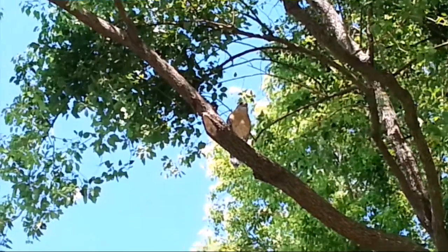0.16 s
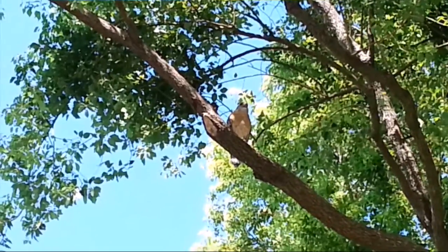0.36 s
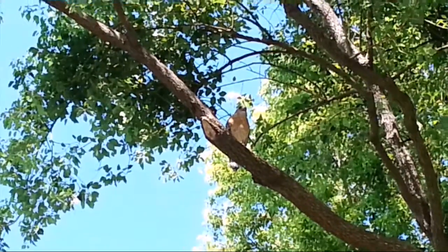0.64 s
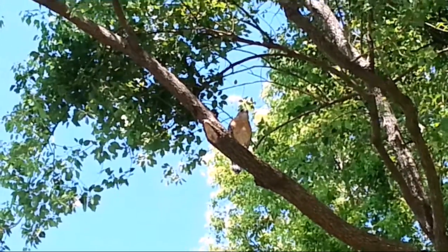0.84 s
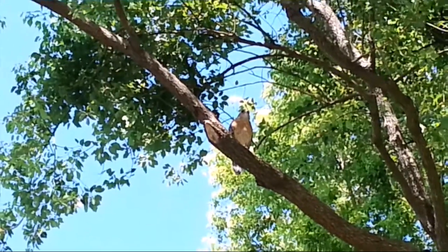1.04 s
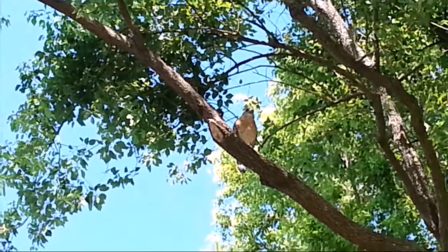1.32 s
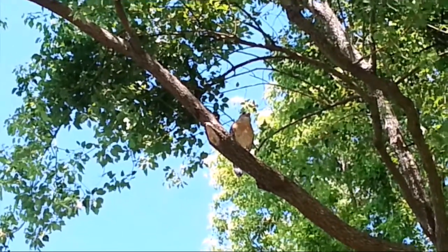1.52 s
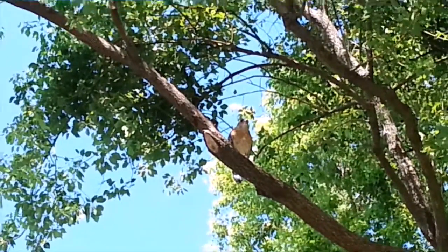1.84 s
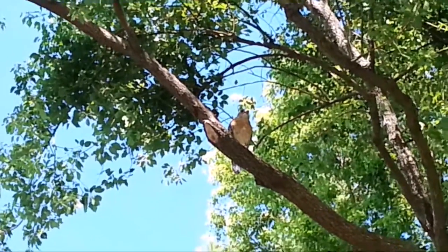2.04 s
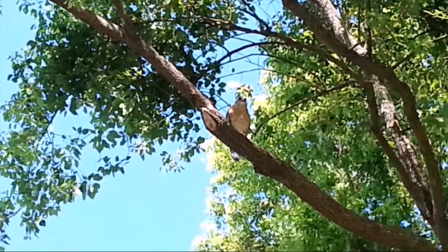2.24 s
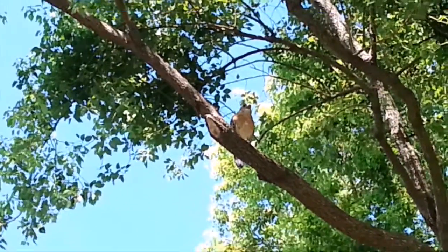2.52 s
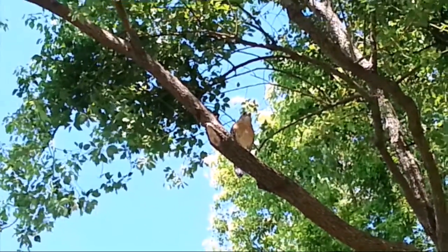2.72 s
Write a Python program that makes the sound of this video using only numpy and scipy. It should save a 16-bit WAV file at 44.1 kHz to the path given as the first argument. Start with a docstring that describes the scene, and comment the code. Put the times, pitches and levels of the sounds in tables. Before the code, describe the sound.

Hawk screams harshly three times from a tree while low wind rumbles and thumps the microphone

```python
"""Gusty wind over a faint outdoor hiss of leaves, with a far hum and insects: noise cut into wide and narrow bands.
A hawk on a branch then screams three times, each a stack of overtones following a pitch curve:
a quick rise, a loud sagging note that breaks down twice, a weak falling tail.
Near branches and farther trees scatter the voice: it is convolved with dying noise.
Wind also thumps on each microphone port, as short wave bursts; near the end come dry taps, as fast-dying sines."""
import sys
import numpy as np
from scipy import signal
from scipy.io import wavfile

SR = 44100
rng = np.random.default_rng(int(sys.argv[2]) if len(sys.argv) > 2 else 0)


def waveform_to_disk(signal):
    """Save audio, clipped to [-1, 1], as 16-bit WAV at the path in sys.argv[1]."""
    frames = np.transpose(np.atleast_2d(signal))
    scaled = np.clip(frames, -1, 1) * 32767
    samples = np.round(scaled).astype(np.int16)
    wavfile.write(sys.argv[1], SR, samples)


N = 127890  # length in samples, 2.9 s


def from_db(db):
    """Turn decibels into a plain factor."""
    return 10 ** (np.asarray(db) / 20)


def rms_one(x):
    """Scale a sound to an average strength (RMS) of 1."""
    return x / np.sqrt(np.mean(x ** 2) + 1e-20)


def at_hz(points, hz, column=1):
    """Read one column of a table at any frequency, along a logarithmic pitch scale."""
    points = np.array(points, float)
    return np.interp(np.log(hz), np.log(points[:, 0] + 1), points[:, column])


def drift(hz, size=N):
    """Random wandering of RMS 1: noise smoothed twice, so that it moves at about the given speed."""
    warm_up = 8000
    r = np.exp(-2 * np.pi * hz / SR)
    noise = rng.standard_normal(size + warm_up)
    smooth = signal.lfilter([1], [1, -2 * r, r * r], noise)
    return rms_one(smooth[warm_up:])


def band(x, low_hz, high_hz):
    """Keep mainly what lies between two frequencies."""
    sos = signal.butter(2, [low_hz, high_hz], "band", fs=SR, output="sos")
    return signal.sosfilt(sos, x)


# course of the wind at the ports: time_s, level_db (before the lift), left_minus_right_db
WIND_COURSE = [(0.0, -51.5, -11), (0.35, -40.5, 4.5), (0.39, -44, -10), (0.45, -43, 12), (0.49, -50, -2),
               (0.84, -51, -4), (1.0, -34, -3), (1.08, -43.5, -5), (1.57, -45, -5.5), (1.61, -40.5, 4),
               (1.71, -48, 4), (1.77, -43.5, -5), (2.08, -42.5, 7.5), (2.33, -41.5, -5), (2.43, -44, 22),
               (2.46, -45.5, -0.5), (2.82, -50, 4.0), (2.9, -44, -13)]
WIND_LOW_HZ, WIND_HIGH_HZ, WIND_LIFT_DB = 67.1, 1.46 * 187, 5.5
LUMP_DB, LUMP_HZ = 3, 25.4  # how strongly and how fast the noise swells


def wind():
    """Moving air makes lumpy low noise at each port, independent of the other."""
    time_s, level_db, pan_db = np.transpose(WIND_COURSE)
    t = np.arange(N) / SR
    out = np.zeros((2, N))
    for port, side in enumerate((.5, -.5)):
        lumps = rng.standard_normal(N) * from_db(LUMP_DB * drift(LUMP_HZ))
        rumble = rms_one(band(lumps, WIND_LOW_HZ, WIND_HIGH_HZ))
        port_db = np.interp(t, time_s, level_db + side * pan_db)
        out[port] = from_db(WIND_LIFT_DB + port_db) * rumble
    return out


# tone colour of the hiss: pitch_hz, relative level_db (only the differences count)
AIR_COLOUR = [(180, -30), (300, -9.5), (444, -28.5), (532, 12), (752, -23), (823, 6.5), (1160, -18.5),
              (1290, -12.5), (1620, -19), (1910, -15.5), (2060, -8), (3610, -17.5), (4520, -13),
              (6390, -33.5), (8640, -18.5), (10000, -14.5), (11000, -79.5), (14300, -103), (22000, -120)]
# how alike left and right are: pitch_hz, likeness (-1 opposite, 0 unrelated, 1 the same)
AIR_ALIKE = [(60, 0.3), (220, 0.12), (830, 0.35), (3080, -0.4), (11500, 0.38)]
AIR_DB, AIR_TOP_HZ = -43, 10200  # overall level, upper end
PATCHY_DB, PATCHY_HZ = 3.2, 11.2  # flicker depth and speed


def air():
    """Leaves: third-octave bands of noise, each flickering on its own."""
    out = 0
    edges_hz = 280 * 2 ** np.arange(0, 5.4, 1 / 3)
    # neighbouring bands take turns with two noise pairs, so they stay unrelated
    white = rng.standard_normal((2, 2, N))
    for k, (low_hz, high_hz) in enumerate(zip(edges_hz, edges_hz[1:])):
        mid, side = band(white[k % 2], low_hz, high_hz)
        centre_hz = np.sqrt(low_hz * high_hz)
        alike = np.clip(at_hz(AIR_ALIKE, centre_hz), -1, 1)
        stereo = np.sqrt(1 + alike) * mid + np.sqrt(1 - alike) * side * [[1], [-1]]
        level_db = at_hz(AIR_COLOUR, centre_hz) + PATCHY_DB * drift(PATCHY_HZ)
        out = out + from_db(level_db) * stereo
    top_cut = signal.cheby2(8, 50, AIR_TOP_HZ, fs=SR, output="sos")
    return from_db(AIR_DB) * rms_one(signal.sosfilt(top_cut, out))


# far hum and insects: pitch_hz, width_hz, level_db (before the flicker)
NARROW_BANDS = [(533, 29, -55.5), (4730, 310, -61), (9050, 590, -62)]


def drones():
    """A far hum and insects: flickering narrow bands of noise, partly shared by the ports."""
    out = 0
    for hz, width_hz, level_db in NARROW_BANDS:
        noise = rng.standard_normal(N) + 0.47 * rng.standard_normal((2, N))  # shared + own
        tone = rms_one(band(noise, hz - width_hz / 2, hz + width_hz / 2))
        out = out + from_db(level_db + 2.5 * drift(10)) * tone
    return out


# one list per scream: time_s, pitch_hz (before jitter), effort level_db (before overtone and path levels)
SCREAM_CURVES = [
    [(0.186, 682, -19.5), (0.198, 888, -17.5), (0.21, 1004, -7.5), (0.214, 1296, -5.5), (0.218, 1316, -3.5),
     (0.228, 1350, 2), (0.248, 1359, 2.5), (0.292, 1316, -2), (0.336, 1307, -3), (0.456, 1235, -4.5),
     (0.5, 1204, -7), (0.518, 1131, -6.5), (0.546, 1126, -8), (0.562, 1096, -6), (0.566, 1078, -7.5),
     (0.568, 1043, -13), (0.57, 1015, -11), (0.666, 1006, -11), (0.736, 969.6, -14.5), (0.774, 969.4, -14),
     (0.83, 922, -16.5), (0.848, 902.4, -16.5), (0.86, 869, -14.5), (0.868, 816, -15.5),
     (0.9, 547.4, -26.5), (0.906, 542, -31)],
    [(1.236, 677, -20.5), (1.244, 740, -17.9), (1.248, 870, -19), (1.26, 1040, -8), (1.264, 1246, -12.8),
     (1.268, 1340, 0.4), (1.28, 1373, 2), (1.302, 1365, 2.5), (1.374, 1303, -3), (1.456, 1278, -4.5),
     (1.504, 1229, -5), (1.534, 1216, -7.5), (1.544, 1195, -6), (1.548, 1163, -8), (1.552, 1141, -5),
     (1.592, 1122, -7), (1.602, 1100, -8.5), (1.608, 1093, -5.5), (1.614, 1053, -7.5), (1.616, 1026, -11),
     (1.702, 1005, -11), (1.844, 928, -15.5), (1.868, 858, -15.5), (1.878, 816, -14.5), (1.9, 621, -22.5),
     (1.916, 559.5, -39)],
    [(2.182, 709, -20.5), (2.188, 742, -17.5), (2.198, 942, -12), (2.206, 1022, -9.5), (2.208, 1233, -9.8),
     (2.214, 1348, -0.7), (2.224, 1351, 1.5), (2.238, 1364, 3.5), (2.268, 1325, -0.5), (2.372, 1273, -3.5),
     (2.414, 1227, -6.5), (2.436, 1194, -6), (2.448, 1123, -4.5), (2.474, 1112, -6.5), (2.484, 1093, -4.5),
     (2.488, 1063, -10.5), (2.49, 1035, -19), (2.492, 1031, -8), (2.53, 1030, -10.5), (2.62, 976.2, -12.5),
     (2.662, 968.6, -14), (2.73, 933.5, -15), (2.74, 923, -15.5), (2.78, 853, -16), (2.784, 848, -15),
     (2.826, 529, -25.5)],
]
# overtones at the syrinx, the bird's voice organ, from the fundamental up: level_db
OVERTONE_LEVELS = [0.64, 0.22, -0.24, -1, 0, 0, 2, -2, 6.8, 12, 6.5]
# throat, beak and nearby reflections as each port hears them:
# pitch_hz, left_db, right_db, left_lead_rad (how far the left wave runs ahead)
VOICE_PATH = [(860, -32, -31.5, -1), (961, -21.5, -25, -5.7), (1034, -39, -31.5, 1.2),
              (1110, -32, -26.5, 0.1), (1147, -27.5, -23, -0.4), (1240, -20.5, -18.5, -1.8),
              (1380, -23, -22.5, 0.8), (1670, -24, -25.5, 1), (1817, -15, -10, 0.8),
              (1806, -17.3, -4.5, -0.3), (2012, -16, -6.5, 2.5), (2184, -8, -6.5, 3),
              (2180, -12.7, -16.5, 1.5), (2307, -6.5, -7, -0.2), (2411, -2, -5.5, -0.06),
              (2495, -0.5, 1.5, -0.44), (2534, -1.5, -0.65, -0.5), (2597, -12, -2.5, 0.1),
              (2654, -9, -6, -1.54), (2692, -16, -10.5, -2.5), (2737, -9, -11.5, -2), (2760, -3, -13, -0.3),
              (2916, -5.5, -7.5, -2.3), (3014, -10.5, -10.5, 0.5), (3074, -16, -15.5, -0.8),
              (3130, -22.5, -19.5, 0), (3320, -11, -12, -2.5), (3440, -9, -11.5, -1.5),
              (3686, -17, -10.5, 0.5), (3747, -21.5, -25, 1.3), (3960, -16.5, -23, 0.9),
              (4000, -16.5, -15.5, -1), (4250, -28.5, -24.3, -1), (4340, -28, -26.3, -2),
              (4532, -17, -18, -0.8), (4730, -12.5, -10.5, 0.3), (4847, -15.5, -10, 0.6),
              (5024, -22, -25, 0.9), (5133, -22, -18, 1.6), (5310, -22, -14.5, 0.5),
              (5505, -21.5, -14.5, 1.4), (5210, -29, -19, 0.4), (6150, -27.5, -26.5, 1.5),
              (6430, -31.5, -32, 1.6), (6330, -26, -25, 1.86), (6670, -27, -32.5, 2),
              (7570, -30.5, -42, -0.2), (8130, -29, -35, 0.3), (8220, -38, -47, 2),
              (8900, -39.5, -41.5, 0.7), (9100, -40.5, -57.5, -0.6), (9800, -40, -51, 1.4),
              (10300, -37, -52.5, 0), (10100, -44, -59, -6), (10600, -42, -57.5, -6),
              (11200, -29.5, -32, -2)]
FADE_S = .006
JITTER, JITTER_HZ = .0007, 50  # pitch wobble: share of the pitch, speed
SHIMMER_DB, SHIMMER_HZ = 1.0, 30  # loudness wobble of each overtone
DULL_DB = 0.04  # per overtone number and dB of effort: weaker cries sound duller
HOARSE, HOARSE_S, HOARSE_HZ = 0.69, 0.03, 490  # crack at the start: depth, how long, speed
RASP_DB, RASP_HZ, RASP_WIDTH_HZ = -42, 2920, 1300  # air noise in the throat; level relative to effort
TOP_HZ = 11000  # overtones fade out over the last 200 Hz below this


def hawk():
    """The syrinx sounds a stack of overtones, hoarse at first; the path colours each, throat air adds rasp."""
    out = np.zeros((2, N))
    for rows in SCREAM_CURVES:
        time_s, pitch_hz, level_db = np.transpose(rows)
        first = int((time_s[0] - FADE_S) * SR)
        last = min(N, int((time_s[-1] + FADE_S) * SR))
        at = np.arange(first, last)
        t = at / SR
        size = len(t)
        pitch = np.interp(t, time_s, pitch_hz) * (1 + JITTER * drift(JITTER_HZ, size))
        phase = 2 * np.pi * np.cumsum(pitch) / SR
        effort_db = np.interp(t, time_s, level_db)
        fade = np.clip(np.minimum(t - t[0], t[-1] - t) / FADE_S, 0, 1)
        gain = from_db(effort_db) * fade
        hoarse = HOARSE * np.exp(-((t - time_s[0]) / HOARSE_S) ** 4)

        for k, own_db in enumerate(OVERTONE_LEVELS, 1):
            hz = k * pitch
            shimmer_db = SHIMMER_DB * drift(SHIMMER_HZ, size)
            level = gain * from_db(own_db + DULL_DB * k * effort_db + shimmer_db)
            level *= 1 + hoarse * drift(HOARSE_HZ, size)
            level *= np.clip((TOP_HZ - hz) / 200, 0, 1)
            start = rng.uniform(0, 2 * np.pi)
            half_lead = at_hz(VOICE_PATH, hz, column=3) / 2
            left_gain = from_db(at_hz(VOICE_PATH, hz, column=1))
            right_gain = from_db(at_hz(VOICE_PATH, hz, column=2))
            out[0, at] += level * left_gain * np.sin(k * phase + start + half_lead)
            out[1, at] += level * right_gain * np.sin(k * phase + start - half_lead)

        noise = rng.standard_normal(size)
        rasp = rms_one(band(noise, RASP_HZ - RASP_WIDTH_HZ / 2, RASP_HZ + RASP_WIDTH_HZ / 2))
        out[:, at] += from_db(RASP_DB) * gain * rasp
    return out


# level, time to die by 60 dB, wait before the first echo
NEAR_DB, NEAR_T60_S, NEAR_GAP_S = -11, 0.25, .004
FAR_DB, FAR_T60_S, FAR_GAP_S = -25.5, 1.15, 0.055


def canopy(voice):
    """Near branches, then fainter farther trees, return dense dying echoes, different at each port."""
    t = np.arange(SR) / SR  # echoes last up to 1 s
    echoes = 0
    for level_db, t60_s, gap_s in ((NEAR_DB, NEAR_T60_S, NEAR_GAP_S), (FAR_DB, FAR_T60_S, FAR_GAP_S)):
        tail = rng.standard_normal((2, len(t))) * from_db(-60 * t / t60_s) * (t > gap_s)
        energy = np.sum(tail ** 2, axis=1, keepdims=True)
        echoes = echoes + from_db(level_db) * tail / np.sqrt(energy)
    return signal.fftconvolve(voice, echoes, axes=1)[:, :N]


# strongest thumps of wind: middle_s, level_db (top of the envelope), pitch_hz,
# port (whole part counts: 0 left, 1 right)
THUMPS = [(0.282, -22, 170.0, 0), (0.293, -26, 180.0, 0), (0.306, -27, 120.0, 1), (0.329, -16, 210.0, 0),
          (0.353, -14.5, 211, 0), (0.358, -30, 150.0, 1), (0.366, -14.5, 149, 1), (0.377, -20, 109, 1),
          (0.393, -25, 119, 1), (0.44, -13.5, 305, 0.048), (0.662, -26, 170.0, 0), (0.924, -23, 167, 1),
          (0.939, -28, 160.0, 1), (0.964, -22, 150.0, 0), (0.973, -13, 201, 1), (0.978, -22, 300.0, 0),
          (0.987, -12, 200.0, 1), (0.989, -19, 210.0, 0), (1, -7.5, 260.0, 1), (1.011, -23, 100.0, 1),
          (1.024, -23, 120.0, 0), (1.026, -23, 180.0, 1), (1.036, -16, 245, 0), (1.04, -24, 150.0, 1),
          (1.052, -23, 160.0, 0), (1.058, -25, 150.0, 1), (1.075, -25, 160.0, 0.98), (1.076, -25, 180.0, 0),
          (1.09, -18, 170.0, 0.032), (1.096, -26, 190.3, 1), (1.124, -25, 150.0, 1), (1.137, -15, 200.0, 0),
          (1.296, -22, 169.3, 1), (1.305, -24, 220.0, 0), (1.317, -15.5, 200.0, 1),
          (1.325, -13.5, 220.0, 0), (1.339, -12.5, 262, 1), (1.379, -19, 230.0, 0), (1.39, -24.5, 120.0, 0),
          (1.396, -22, 130.0, 1), (1.412, -23, 130.0, 1), (1.425, -19.5, 200.0, 0), (1.43, -23.5, 220.0, 1),
          (1.553, -24.5, 130.0, 1), (1.577, -22.5, 129.4, 1), (1.595, -19, 161, 0), (1.615, -17.5, 222, 0),
          (1.647, -19, 220.0, 0), (1.672, -21.5, 208, 0), (1.706, -22.5, 198, 0), (1.725, -23, 189, 0),
          (1.756, -23, 197, 0), (1.836, -24.5, 201, 0), (1.91, -24, 149.5, 0), (1.924, -18.5, 179.7, 0),
          (1.942, -24.5, 201, 1), (2.058, -16.5, 202, 0), (2.085, -17, 200.4, 0), (2.093, -22.5, 150.0, 1),
          (2.129, -21, 200.0, 0.18), (2.134, -28, 130.0, 1), (2.135, -21.5, 200.0, 0.073),
          (2.169, -26, 170.0, 1), (2.186, -25.5, 171, 0), (2.217, -20, 188, 0.14), (2.229, -26, 190.0, 0),
          (2.251, -23, 220.0, 0), (2.281, -24, 152, 1), (2.294, -25, 140.0, 1), (2.308, -26, 200.0, 0),
          (2.338, -23, 192, 1), (2.358, -22, 178, 1), (2.379, -16, 180.0, 0), (2.391, -22, 298, 0),
          (2.402, -19, 300.0, 0), (2.422, -10, 168, 0), (2.625, -22, 159, 0), (2.703, -22.5, 148, 0),
          (2.898, -21, 129.7, 1)]
THUMP_CYCLES = 0.52  # spread of the bell-shaped envelope, in cycles of its own pitch


def buffets():
    """An eddy hitting one port makes a short thump: a low wave under a bell-shaped envelope."""
    out = np.zeros((2, N))
    half = 600  # samples on either side of the middle
    u = np.arange(-half, half) / SR
    for middle_s, level_db, hz, port in THUMPS:
        turn = rng.random()  # random starting point in the cycle
        envelope = np.exp(-.5 * (u * hz / THUMP_CYCLES) ** 2)
        thump = envelope * np.cos(2 * np.pi * (hz * u + turn))
        at = int(middle_s * SR) - half + np.arange(len(u))
        inside = at < N
        out[int(port), at[inside]] += from_db(level_db) * thump[inside]
    return out


# dry taps: start_s, level_db (before the decay), left_minus_right_db
TAPS = [(2.089, -24, 15), (2.551, -45, 3), (2.569, -26.5, 6), (2.619, -29.5, 21), (2.703, -28.5, 12),
        (2.738, -33, 10)]
TAP_HZ, TAP_DECAY_S = 1130, 0.00042


def ticks():
    """Short dry taps: a sine that dies away within a few thousandths of a second."""
    out = np.zeros((2, N))
    u = np.arange(300) / SR
    tap = np.exp(-u / TAP_DECAY_S) * np.sin(2 * np.pi * TAP_HZ * u + .5)
    for start_s, level_db, pan_db in TAPS:
        port_db = level_db + np.array([[.5], [-.5]]) * pan_db
        start = int(start_s * SR)
        out[:, start:start + len(u)] += from_db(port_db) * tap
    return out


def scene():
    """Add up all the sounds."""
    voice = hawk()
    return wind() + air() + drones() + voice + canopy(voice) + buffets() + ticks()


LOW_CUT_HZ, CEILING, TOP_CUT_HZ = 55, .86, 12000  # ceiling: full scale is 1


def record(dry):
    """The deepest rumble is cut, the highest peaks are rounded, the top is cut."""
    low_cut = signal.butter(3, LOW_CUT_HZ, "high", fs=SR, output="sos")
    x = signal.sosfilt(low_cut, dry)
    x = x / (1 + (x / CEILING) ** 8) ** (1 / 8)
    top_cut = signal.cheby2(12, 70, TOP_CUT_HZ, fs=SR, output="sos")
    return signal.sosfilt(top_cut, x)


dry = scene()
out = record(dry)
waveform_to_disk(out)
```